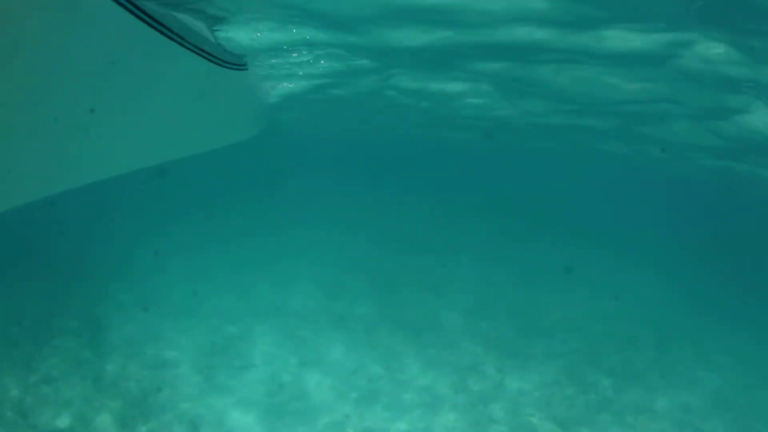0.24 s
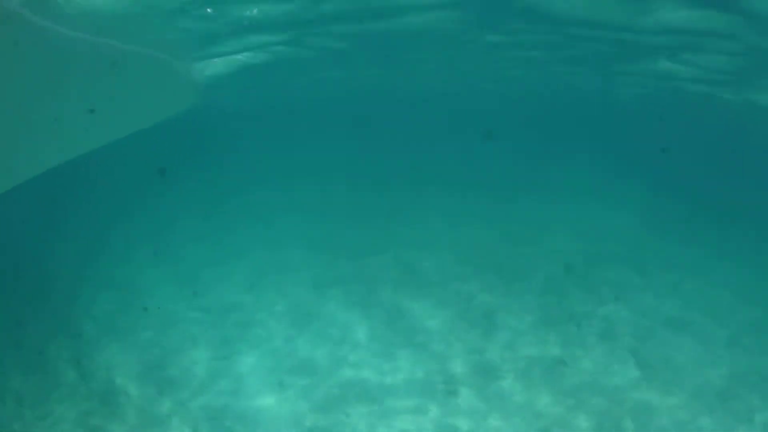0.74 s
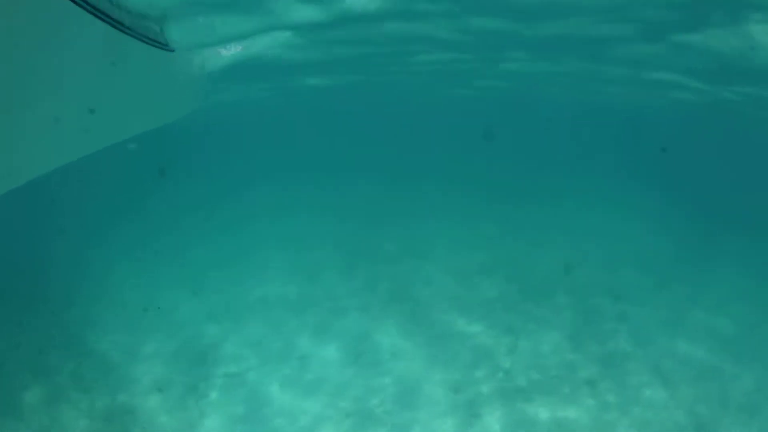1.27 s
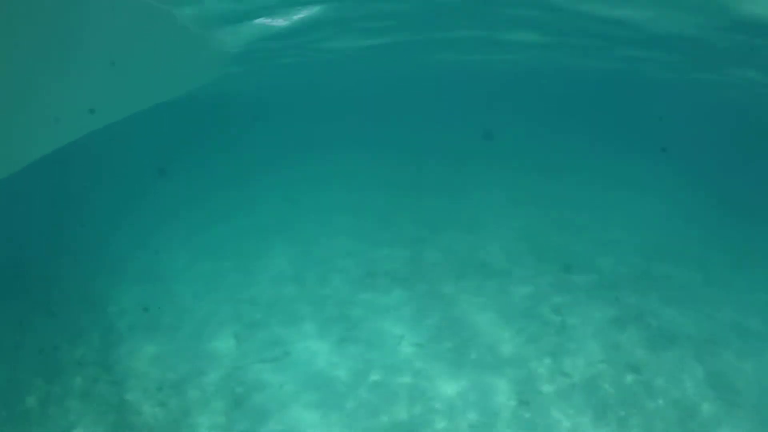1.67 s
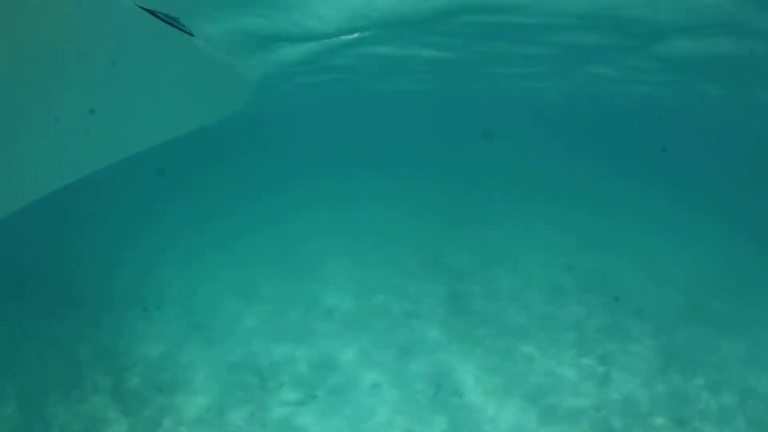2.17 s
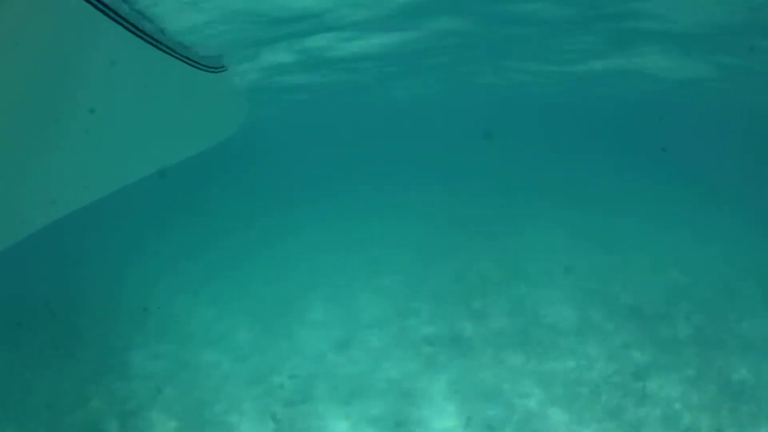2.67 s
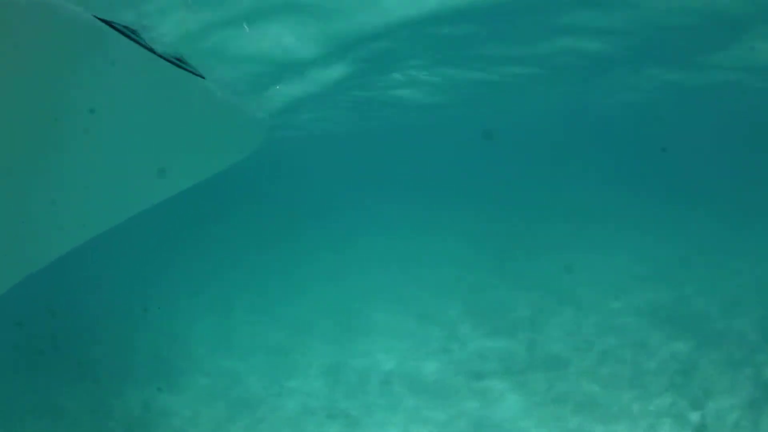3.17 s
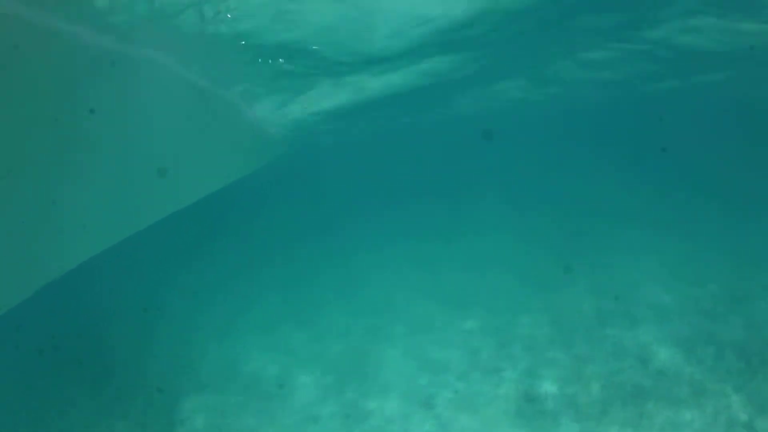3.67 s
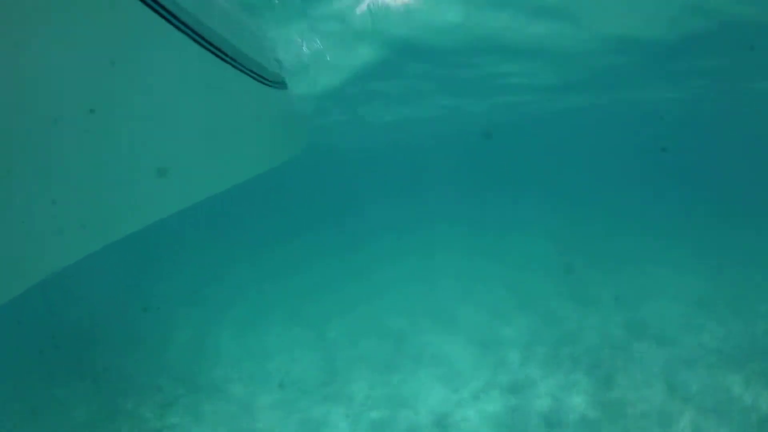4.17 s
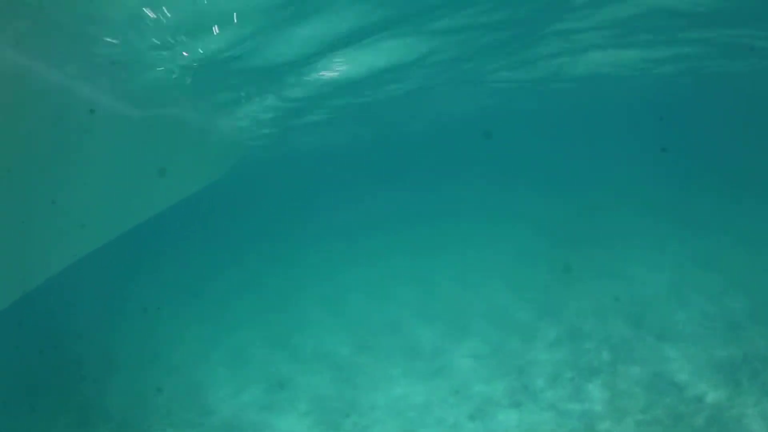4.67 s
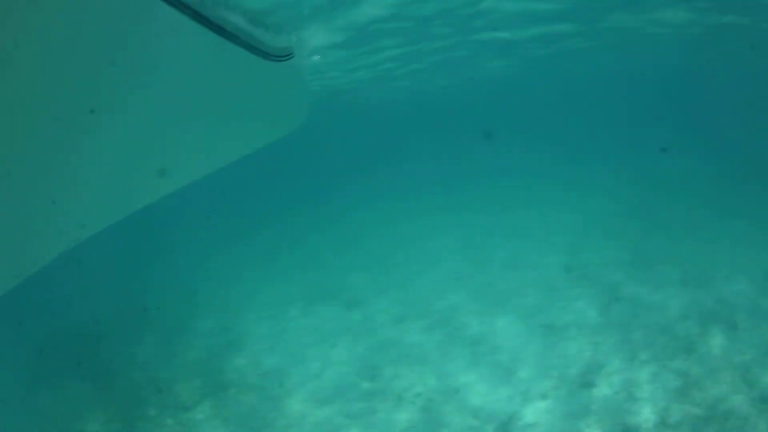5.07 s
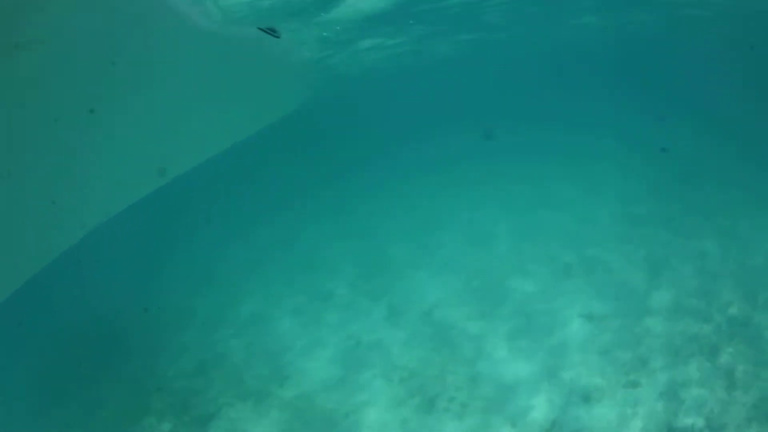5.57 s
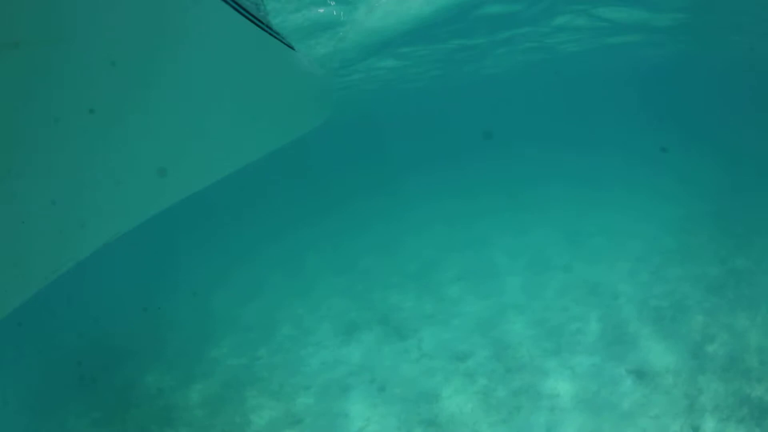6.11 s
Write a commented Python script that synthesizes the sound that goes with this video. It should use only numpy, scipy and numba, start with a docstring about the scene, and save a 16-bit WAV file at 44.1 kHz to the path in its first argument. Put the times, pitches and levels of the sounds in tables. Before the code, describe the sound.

Close underwater sound beside a sailing hull, boxy and resonant as if inside a small sealed housing. At 0 s it is nearly quiet, with faint hiss, then a clear hollow plop at 0.16 s and a few mid-pitched bloops by 0.4 s. A low round bloop follows at 0.7 s, then a thin lull with isolated bright ticks around 1.2 s. Gurgling returns near 1.6 s; a strong low, rising gulp knocks at 2.15 s, another short one at 2.5 s. From 3 s the stream is fuller, with low rumble, fluttering wash and fizz; a ringing plop stands out at 3.4 s. Around 4.5 to 4.8 s a tight, sharp clatter of ringing pops and snaps bursts out. Afterwards low gurgles and glassy clicks continue densely, with a bright snap at 5.9 s, and the rushing swells to its loudest by 6.3 s.

```python
"""Bubbles ring for tens of cycles as water streams past a small camera in a sealed housing, beside a sailing hull.
Big bubbles and small snaps are listed sliding or steady decaying sines, with thumps, broods and noise jolts.
Swarms of random sines over flickering noise, fine ticks and a low rumble follow the flow of the stream.
Swarms, turbulence, rumble, jolts and ticks take the colour of the housing; the microphone adds hiss.
"""
import sys
import numpy as np
from scipy import signal
from scipy.fft import rfft, irfft
from scipy.io import wavfile
from scipy.ndimage import uniform_filter1d
from numba import njit

SR = 44100
rng = np.random.default_rng(int(sys.argv[2]) if len(sys.argv) > 2 else 0)


def unload_wav(signal):
    """Save mono or channel-first audio to the path in sys.argv[1] as 16-bit WAV at rate SR, clipped to [-1, 1]."""
    wavfile.write(
        sys.argv[1],
        SR,
        np.round(np.clip(np.atleast_2d(signal).T, -1, 1) * 32767).astype(np.int16),
    )


N = 279594

# Big bubbles that stand out: t/s, pitch f/Hz, peak level/dB, t60/ms, glide/(octaves per s)
BIG_BUBBLES = [(0.019, 1524, -42.5, 78, 2), (0.065, 1570, -41, 68, 0), (0.157, 324, -35.5, 81, 4),
               (0.1605, 870, -14, 64, 8), (0.217, 936, -32.5, 43, -5.5), (0.295, 1570, -33.5, 41, -3),
               (0.304, 653, -22.5, 67, -3), (0.352, 335, -25, 28, 9), (0.354, 1290, -25, 61, -2),
               (0.366, 928, -21.5, 81, -2), (0.401, 908, -20, 58, -0.5), (0.407, 307, -24.5, 15, -11),
               (0.457, 325, -30.5, 89, 3), (0.474, 1253, -33.5, 46, 4), (0.508, 1577, -36.5, 110, -2),
               (0.617, 834, -34.5, 110, 1), (0.649, 327, -29.5, 45, -4), (0.6999, 323.6, -16, 220, 1.5),
               (0.715, 926, -31, 63, 0), (0.757, 310, -22, 185, 2.5), (0.884, 316.5, -21.5, 160, 7),
               (0.891, 918, -30, 140, 0), (1.085, 867, -39.5, 110, -0.5), (1.145, 1440, -42.5, 76, 2),
               (1.196, 323, -33.5, 34, 8), (1.321, 887, -29.5, 47, 10), (1.359, 1545, -38, 60, -3),
               (1.449, 790, -31, 120, 0.5), (1.457, 305, -25.5, 37, 6), (1.547, 301, -31.5, 98, -3),
               (1.571, 304, -29.5, 600, 0), (1.645, 942, -34, 100, -2.5), (1.6608, 1410, -28, 18, -25),
               (1.737, 329, -28, 81, 3), (1.7519, 355.5, -25.5, 206, 3), (1.8088, 632, -26.5, 77, 8),
               (1.896, 1497, -38, 140, 2), (1.966, 359, -28.5, 113, 7.5), (2.0812, 1394, -22.5, 43, 9.5),
               (2.091, 1510, -29, 35, -13), (2.148, 917, -24, 116, 1), (2.1487, 329, -7, 58, 18),
               (2.239, 317, -19.5, 75, 19), (2.261, 403, -25, 170, 3), (2.315, 878, -25, 130, 5),
               (2.3359, 368, -23.5, 135, 0), (2.4733, 347, -14, 16, 6), (2.529, 295, -22.5, 60, 0),
               (2.532, 940, -28, 120, 0), (2.5696, 301, -15.5, 73, 10), (2.604, 325, -18.5, 350, -3),
               (2.604, 844, -22.5, 42, -16), (2.6462, 800, -27, 22, 6), (2.732, 332, -25.5, 210, -3.5),
               (2.799, 344, -27, 68, -5), (2.815, 375, -24, 86, 5), (2.8579, 358, -21, 90, 5.5),
               (2.9984, 1466, -27.5, 72, 4), (3.029, 320, -20.5, 30, 16), (3.031, 1350, -27.5, 29, -7),
               (3.127, 1466, -25.5, 70, 0), (3.155, 322, -23.5, 87, -3), (3.1565, 910, -21, 14, 6),
               (3.2069, 1540, -28.5, 78, -3), (3.3874, 864, -29, 150, 11.5), (3.416, 917, -19.5, 44, 2),
               (3.422, 1370, -24.5, 12, 7), (3.434, 938, -10, 88, 1.5), (3.5137, 286, -18, 270, 3.5),
               (3.555, 342, -18.5, 93, 0), (3.723, 335.4, -23.5, 260, 3.5), (3.731, 1526, -28.5, 39, -18),
               (3.788, 348, -27, 100, 6), (3.8228, 314, -14.5, 115, -2.5), (3.926, 917, -25.5, 83, -3),
               (4.031, 326, -20, 130, -3.5), (4.1112, 1515, -29, 38, 0), (4.136, 1230, -21.5, 42, 2),
               (4.1643, 1504, -28, 86, -1), (4.1783, 613, -22.5, 38, -5), (4.3177, 331, -20.5, 130, -0.5),
               (4.371, 292, -18.5, 200, 2), (4.474, 263, -27.5, 170, -2), (4.5125, 350, -16.5, 32, -6),
               (4.5285, 1420, -27.5, 48, 9.5), (4.577, 279, -24, 300, 0), (4.6673, 1560, -19, 52, -7),
               (4.6773, 858, -21.5, 110, 12.5), (4.6894, 1356, -9.5, 31, 7), (4.7095, 650, -16, 40, 0),
               (4.7105, 928, -16.5, 46, -2), (4.711, 1434, -10, 45, 6), (4.7338, 1160, -24.5, 39, -8),
               (4.737, 2390, -23.5, 68, 3.5), (4.766, 1030, -21.5, 24, 12), (4.7721, 1544, -17, 35, 4.5),
               (4.7899, 970, -24, 63, 0), (4.8154, 987, -23, 80, -7), (4.8195, 1565, -26, 49, -5),
               (4.877, 1502, -24.5, 86, 2.5), (4.898, 303, -25.5, 170, 9), (4.949, 323, -20, 110, -4),
               (4.9509, 847, -23.5, 64, 6), (4.997, 313, -18, 57, 14), (5.038, 357, -28, 110, -7.5),
               (5.1157, 980, -25, 74, -5), (5.147, 291, -17, 78, -7), (5.154, 1040, -23.5, 23, -13),
               (5.249, 306, -19, 140, 1.5), (5.2623, 916, -22.5, 43, 0), (5.3, 900, -23.5, 130, 2),
               (5.339, 335, -19, 60, -17), (5.353, 309.5, -21, 220, 3.5), (5.389, 304, -20, 170, 5),
               (5.4138, 293, -17.5, 190, 3), (5.4875, 364, -23.5, 280, 0.5), (5.5206, 916, -26.5, 41, 12),
               (5.55, 336, -18.5, 146, -11.5), (5.607, 301, -29.5, 330, -3.5), (5.7006, 921, -23.5, 69, 2),
               (5.774, 358, -29, 210, -0.5), (5.977, 330, -18.5, 64, 6.5), (6.0685, 860, -17, 78, 1),
               (6.094, 313, -24, 130, 4), (6.1167, 897, -19.5, 50, 6), (6.1259, 251.3, -17.5, 180, 6),
               (6.154, 637, -19, 42, -10), (6.1776, 1020, -24, 51, -6), (6.188, 333, -24, 150, -5.5),
               (6.236, 328, -25.5, 110, 9.5), (6.2752, 895, -22, 56, 3)]
# Small bubbles that snap off close by: t/s, pitch f/Hz, peak level/dB
SNAP_BUBBLES = [(0.133, 2580, -36.5), (0.1644, 3900, -29), (0.227, 2450, -39.5), (0.246, 6500, -29),
                (0.4115, 2120, -20), (0.502, 3360, -40.5), (0.623, 4270, -39), (0.412, 2920, -31),
                (0.667, 5980, -23.5), (0.675, 3750, -36.5), (0.7792, 5920, -31.5), (0.8123, 6460, -28.5),
                (0.852, 5600, -27.5), (1.2034, 5970, -22), (1.27, 5130, -29.5), (1.2876, 5330, -19),
                (1.3984, 3600, -30), (1.4497, 6100, -32), (1.539, 5600, -29.5), (1.6617, 3000, -18.5),
                (1.687, 6040, -30), (1.8285, 3730, -33), (1.839, 5500, -24), (2.0812, 3220, -26),
                (2.0926, 3420, -23), (2.099, 6380, -22), (2.149, 3440, -15.5), (2.1623, 5940, -24.5),
                (2.1794, 4330, -24.5), (2.2146, 3440, -30), (2.23, 3800, -32), (2.257, 4170, -32.5),
                (2.4274, 6120, -21.5), (2.473, 5930, -24.5), (2.5085, 6000, -23.5), (2.8117, 4230, -25),
                (2.916, 6030, -28.5), (3.1395, 5980, -28), (3.1532, 6250, -28), (3.1652, 4240, -25.5),
                (3.2422, 4180, -31.5), (3.3, 6050, -43), (3.361, 5960, -34), (3.527, 9100, -33.5),
                (3.595, 5840, -19), (3.908, 5950, -29.5), (4.198, 6340, -27.5), (4.235, 5900, -30),
                (4.24, 9170, -29), (4.308, 6030, -26.5), (4.4738, 6120, -25.5), (4.5178, 6460, -25.5),
                (4.518, 8950, -29), (4.5284, 3070, -14.5), (4.5506, 6600, -16), (4.554, 2750, -22),
                (4.6345, 2450, -24), (4.644, 1960, -12), (4.6683, 3070, -23.5), (4.678, 3770, -24.5),
                (4.6808, 7940, -20.5), (4.6896, 2240, -10), (4.703, 3340, -13), (4.707, 5740, -21),
                (4.757, 6100, -31), (4.774, 5900, -13), (4.8284, 5730, -23), (4.9913, 7400, -25.5),
                (5.103, 6380, -16.5), (5.118, 3530, -26), (5.157, 4200, -26.5), (5.2773, 6000, -25),
                (5.42, 5630, -22.5), (5.6098, 7900, -17), (5.62, 5150, -21.5), (5.647, 8400, -31),
                (5.664, 7660, -26.5), (5.6776, 3710, -23.5), (5.7038, 2550, -18), (5.7155, 7150, -17),
                (5.729, 6000, -26), (5.829, 4330, -19), (5.895, 3380, -25), (5.9085, 6820, -10),
                (5.91, 3850, -18), (5.929, 6240, -20.5), (5.966, 2610, -28), (6.008, 6250, -16.5),
                (6.1215, 6100, -24.5), (6.1304, 5930, -20), (6.1483, 6000, -29), (6.1568, 6010, -26),
                (6.213, 6010, -30), (6.2735, 6240, -26), (6.2831, 4600, -20)]
# Swarms by size: lowest f/Hz, highest f/Hz, rate/(bubbles per s), mid t60/cycles,
# size scatter/dB, level relative to the flow/dB
SWARM_SIZES = [(194.6, 500, 60, 33.5, 5, -4.5), (499.6, 1800, 280, 48.5, 4, 3),
               (1839, 11040, 1900, 77, 9.5, 4)]
# Stream course: t/s, then relative level/dB of the flow, the low gurgle and the rumble
STREAM_FLOW = [(0.0, -69, -79, -63), (0.3, -57, -43.5, -58), (0.81, -60.5, -65, -53.5),
               (0.97, -63, -57, -59.5), (1.22, -67.5, -75, -58), (1.43, -59, -45.5, -55),
               (1.62, -54.5, -41, -51), (2.03, -59.5, -47, -57), (2.28, -56.5, -44, -55.5),
               (3.11, -52, -34.5, -49), (3.32, -53.5, -37.5, -53), (3.74, -54, -36, -51.5),
               (4.11, -50, -35, -49.5), (4.5, -52.5, -36, -53.5), (4.91, -52.5, -39, -52),
               (5.14, -50, -30, -47), (5.44, -49.5, -32.5, -50.5), (5.8, -52, -38.5, -49),
               (6.34, -46.5, -28, -44)]
# Housing colour: f/Hz, relative gain/dB
HOUSING_GAIN = [(20, -12.5), (60, -16.5), (200, -12.5), (320, 2), (490, -12.5), (730, -10), (940, -2.5),
                (1150, -24.5), (1500, -7.5), (1800, -33.5), (2200, -29), (3300, -33.5), (4250, -26),
                (5000, -34), (6050, -21), (8000, -32.5), (11000, -41.5), (16000, -60)]

# swell time of a big bubble at 1 kHz and 60 ms of t60; power laws over pitch and t60
SWELL_MS, SWELL_POWER, SWELL_RING_POWER = 3.7, -0.42, 0.3
# snap t60 at 1 kHz, its power law over pitch, and rise time
SNAP_T60_MS, SNAP_POWER, SNAP_RISE_MS = 27.7, -0.31, .3
# middling swarm: dB above the flow at mid flow, and dB per dB of flow
MID_FLOW_DB, MIDDLING_DB, MIDDLING_SLOPE = -54, 8.5, 1.08
# relative to the flow or rumble course; SPIT_SCATTER is spit dB per tick dB
WASH_DB, SPIT_SCATTER, FLUTTER_DB, RUMBLE_DB = -2, .9, 1.0, 6
HISS_DB, TOP_HZ = -65, 15870


def undb(db):
    """Amplitude from dB."""
    return 10 ** (np.asarray(db) / 20)


def level(x, db):
    """Scale to an RMS level in dB."""
    return x * undb(db) / np.sqrt(np.mean(x ** 2))


def band(x, lo_hz, hi_hz):
    """Band-pass with moderate slopes."""
    return signal.sosfilt(signal.butter(2, [lo_hz, hi_hz], "band", fs=SR, output="sos"), x)


def walk(rate_hz):
    """Random levels held 1 / rate_hz and slewed twice; spread near 1."""
    hold = int(SR / rate_hz)
    steps = np.repeat(rng.standard_normal(N // hold + 1), hold)
    return 1.51 * uniform_filter1d(uniform_filter1d(steps, hold), hold)[:N]


@njit
def ring(count, start_s, hz, size, rise_s, t60_s, glide, phase):
    """Each bubble swells, then rings down; its pitch slides during the swell and early ring."""
    out = np.zeros(count)
    for k in range(len(start_s)):
        first, rise, angle = int(start_s[k] * SR), rise_s[k] * SR, phase[k]
        t60 = t60_s[k] * SR
        step, slide = 2 * np.pi * hz[k] / SR, 2 ** (glide[k] / SR)
        fade, amp = 1000 ** (-1 / t60), size[k]
        for i in range(min(int(rise + .7 * t60), count - first)):
            if i < rise:
                out[first + i] += amp * np.sin(np.pi / 2 * i / rise) ** 2 * np.sin(angle)
            else:
                amp *= fade
                out[first + i] += amp * np.sin(angle)
            angle += step
            if i < rise + .3 * t60:
                step *= slide
    return out


def bubbles(thump_db=-9, thump_ms=0.56, quick_ms=4):
    """Big bubbles: low, long-ringing ones swell slowly; quick ones thump the housing harder."""
    s, hz, db, t60_ms, glide = np.array(BIG_BUBBLES, float).T
    rise_ms = SWELL_MS * (hz / 1000) ** SWELL_POWER * (t60_ms / 60) ** SWELL_RING_POWER
    t60_s = np.maximum(t60_ms, 1) / 1000
    tones = ring(N, s, hz, undb(db), rise_ms / 1000, t60_s, glide, 0 * s)
    pushes = np.zeros(N)
    np.add.at(pushes, (s * SR).astype(int), undb(db + thump_db) * np.exp(-rise_ms / quick_ms))
    age = np.arange(1000) * 1000 / SR / thump_ms
    thump = age * (2 - age) * np.exp(1 - age)  # push, then pull
    return tones + signal.fftconvolve(pushes, thump)[:N]


def snaps(brood_db=-8, spread=0.27, brood_ms=7, jolt_db=-17, count=3):
    """Each snap rings shorter the higher it is, sheds a brood of like size and jolts the housing."""
    s, hz, db = np.array(SNAP_BUBBLES, float).T
    t60_s = SNAP_T60_MS * (hz / 1000) ** SNAP_POWER / 1000
    rise_s = 0 * s + SNAP_RISE_MS / 1000
    out = ring(N, s, hz, undb(db), rise_s, t60_s, 0 * s, 0 * s)
    for late, pitch, size in rng.random((len(s), count, 3)).transpose(1, 2, 0):
        near_s = s + late * brood_ms / 1000
        near_hz = hz * (1 + spread * (2 * pitch - 1))
        near_size = undb(db + brood_db) * size
        out += ring(N, near_s, near_hz, near_size, rise_s, t60_s, 0 * s, 0 * s)
    return out + jolt(s, db + jolt_db, tail_ms=5.1)


def jolt(s, db, tail_ms):
    """Decaying bursts of broad noise, rung through the housing; onset RMS near db."""
    kicks = np.zeros(N)
    np.add.at(kicks, (s * SR).astype(int), undb(db))
    shape = signal.lfilter([1], [1, -np.exp(-1000 / (tail_ms * SR))], kicks)
    noise = band(rng.standard_normal(N), 1370, 15500)
    return housing(shape * noise) / np.std(housing(noise))


def swarm(lo_hz, hi_hz, rate, cycles, scatter_db, swarm_db):
    """Random bubbles of one size range over flickering turbulence, both through the housing."""
    when, pitch, ringing, strength, slide, phase = rng.random((int(N / SR * rate), 6)).T
    hz = lo_hz * (hi_hz / lo_hz) ** pitch
    t60_s = cycles / hz * 2.37 ** (2 * ringing - 1)
    # many faint, few strong; .95 caps the strongest
    size = undb(-scatter_db * np.log(1 - .95 * strength)) * np.sqrt(1 / t60_s)
    glide = (slide - .35) * 1.13 / t60_s
    tones = ring(N, when * N / SR, hz, size, 5.0 / hz, t60_s, glide, 2 * np.pi * phase)
    wash = band(rng.standard_normal(N), lo_hz, hi_hz) * undb(3.13 * walk(30))
    return level(housing(tones), swarm_db) + level(housing(wash), WASH_DB)


def crackle(rate=300, scatter_db=8, crackle_db=1.0, sharp_db=-20):
    """Faint broad ticks of the finest bubbles, each with an airy noise spit in the top treble."""
    when, size = rng.random((int(N / SR * rate), 2)).T
    db = -scatter_db * np.log(1 - .98 * size)
    ticks = jolt(when * (N - 1) / SR, db, tail_ms=2.5)
    edges = np.zeros(N)
    edges[(when * (N - 1)).astype(int)] = undb(SPIT_SCATTER * db)
    spit_shape = signal.lfilter([1], [1, -np.exp(-300 / SR)], edges)  # decay 1/300 s
    spits = spit_shape * rng.standard_normal(N)
    return level(band(ticks, 1800, 9600), crackle_db) + level(band(spits, 9500, 17000), sharp_db)


def rumble():
    """Pressure of the stream on the housing: low noise with a quick flutter in level."""
    noise = housing(band(rng.standard_normal(N), 42.4, 164))
    return level(undb(FLUTTER_DB * walk(18)) * noise, RUMBLE_DB)


def housing(x):
    """Resonances of the housing: causal filter from the folded cepstrum of its log gain."""
    hz, db = np.transpose(HOUSING_GAIN)
    bins_hz = np.arange(4097) * SR / 8192
    log_gain = np.interp(np.log(bins_hz + 1), np.log(hz), db) * np.log(10) / 20
    cepstrum = irfft(log_gain)
    cepstrum[1:4096] *= 2
    cepstrum[4097:] = 0
    return signal.fftconvolve(x, irfft(np.exp(rfft(cepstrum))))[:N]


def scene():
    """Listed bubbles and snaps over the stream, which follows the flow course."""
    s, *columns = np.transpose(STREAM_FLOW)
    flow_db, gurgle_db, rumble_db = (np.interp(np.arange(N) / SR, s, db) for db in columns)
    middling_db = MID_FLOW_DB + MIDDLING_DB + MIDDLING_SLOPE * (flow_db - MID_FLOW_DB)
    gurgle, middling, fizz, swing = undb([gurgle_db, middling_db, flow_db, rumble_db])
    stream = fizz * crackle()
    for gain, row in zip((gurgle, middling, fizz), SWARM_SIZES):
        stream += gain * swarm(*row)
    # eddies sweep past and shake bubbles of every size at once
    eddies = undb(2.0 * walk(15))
    return (bubbles() + snaps() + eddies * stream + swing * rumble())[None]


def record(dry):
    """Broad microphone hiss, then a steep cut at the top."""
    hiss = level(band(rng.standard_normal(N), 1100, 13000), HISS_DB)
    return signal.sosfilt(signal.ellip(10, .2, 100, TOP_HZ, fs=SR, output="sos"), dry + hiss)


dry = scene()
out = record(dry)
unload_wav(out)
```